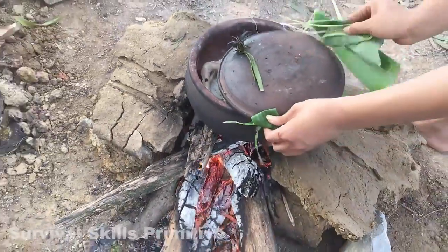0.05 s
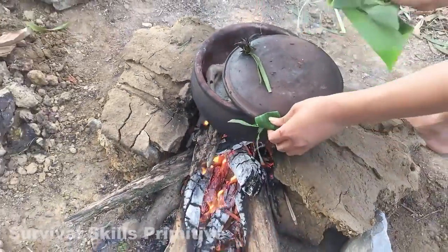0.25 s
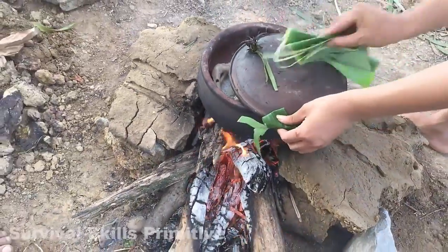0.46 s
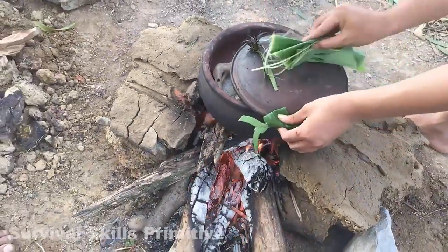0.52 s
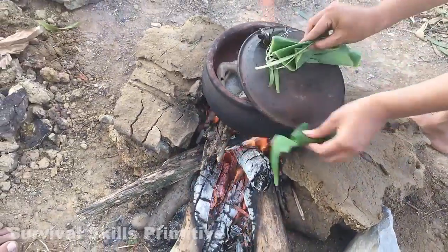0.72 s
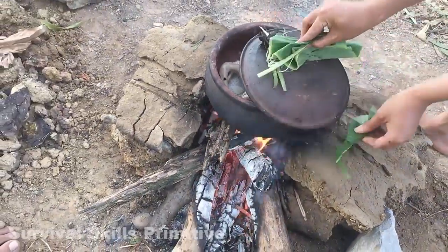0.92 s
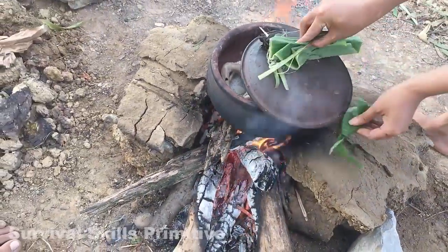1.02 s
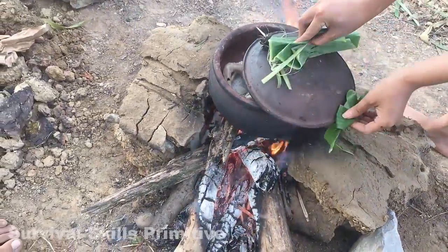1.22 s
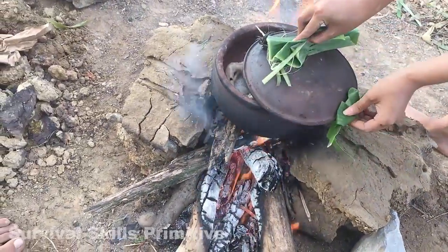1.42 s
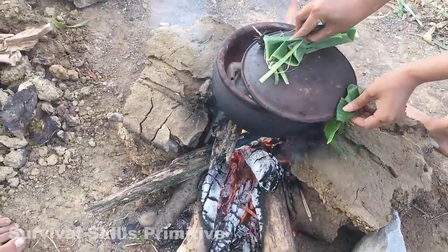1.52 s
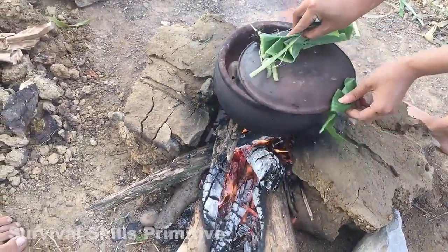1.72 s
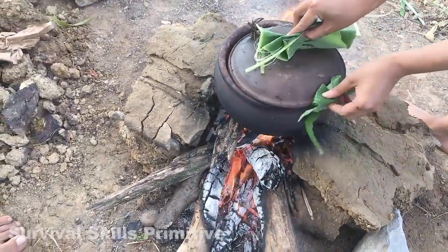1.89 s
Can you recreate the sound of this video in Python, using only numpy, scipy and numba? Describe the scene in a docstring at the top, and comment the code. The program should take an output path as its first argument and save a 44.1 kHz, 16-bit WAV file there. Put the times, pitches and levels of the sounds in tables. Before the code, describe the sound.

Close up outdoors, a clay lid scrapes over a clay pot, clinks sharply, knocks dully into place and scrapes once more. Leaves rustle softly, embers tick and birds chirp far off under a faint wind rumble.

```python
"""A heavy clay lid is shifted on a clay pot over a wood fire, outdoors.
It grinds along the rim, drops with a ringing knock, settles with a dull one, then is dragged again.
Knocks and sand grains caught under the lid make the same clay tones ring. The leaves used as
pot holders rustle, embers tick, birds chirp far off and wind rumbles on the microphone."""
import sys
import numpy as np
from scipy import signal
from scipy.fft import rfft, irfft
from scipy.io import wavfile
from numba import njit

SR = 44100
rng = np.random.default_rng(int(sys.argv[2]) if len(sys.argv) > 2 else 0)


def wav_record(signal):
    """Record a signal, one row per channel, as 16-bit PCM in the file named by sys.argv[1]."""
    frames = np.transpose(np.atleast_2d(signal))
    bounded = np.clip(frames, -1, 1)
    # unit amplitude maps onto the largest positive 16-bit level
    quanta = np.round(bounded * 32767).astype(np.int16)
    wavfile.write(sys.argv[1], SR, quanta)


N = 85995
T = np.arange(N) / SR

# The tones of lid and pot. Each row: pitch in Hz, seconds to fade by 60 dB, gain in dB when
# struck, gain in dB when rubbed.
CLAY_TONES = [(383.4, 0.084, 25, 15), (435.6, .03, 35, 14), (560, 0.014, 28.5, 7), (857, 0.11, 29, -3),
              (949, 0.013, 30.5, 3.5), (1283.3, .088, 36, 12), (1347, 0.012, 26, 0.5),
              (1784, 0.066, 25, 12.5), (2270, 0.11, 47, 23.5), (2257, 0.063, 3.5, 17.5),
              (2850, 0.13, 19.5, 14.5), (2956, 0.011, 19, 9.5), (3396, 0.022, 15.5, 11.5),
              (3780, 0.037, 10.5, 16.5), (4129, 0.081, 24.5, 16.5), (4224, 0.037, -3.5, 16),
              (4830, 0.032, -1.5, -8), (5356, 0.0615, -1, 6), (5710, 0.059, 14, 13),
              (5814, 0.048, -5.5, 12.5), (7070, 0.054, 5.5, 4), (7516, 0.07, 3.5, 13),
              (7440, .055, 1, -12.5), (8900, 0.053, -1, 0.5), (9360, .035, -12, 7.5),
              (11580, 0.0056, -18, -2.5), (13000, 0.026, -13.5, -16), (13900, .02, -6, -3)]
# The two drags. Each row: time in seconds, level in dB, extra bass in dB, extra treble in dB.
FIRST_SLIDE = [(0.0, -46, 8.5, -6.5), (0.028, -47, 13, -4.5), (0.05, -41, -6.5, -23), (0.06, -37, 3.5, -11),
               (0.094, -43, 8, -2.5), (0.132, -35, 3.5, -12), (0.152, -32.5, -4.5, -14.5),
               (0.172, -48, 9.5, -3.5), (0.205, -46, 7.5, -14)]
LAST_SLIDE = [(1.39, -82, -8, 7), (1.434, -49, -10, -3.5), (1.566, -41, 1.5, -4), (1.686, -37.5, -8.5, -6),
              (1.736, -53, 0, -1), (1.78, -43, 0, -2.5), (1.79, -48, 12, 2), (1.812, -37, -4, -2),
              (1.844, -32, -14, 2), (1.858, -39.5, 6, 0), (1.912, -33.5, 1, -2.5), (1.922, -38, 12, -5),
              (1.928, -31, -7, -3), (1.95, -33, -1, -2.5)]
# Brief slips on the rim. Each row: middle and length in seconds, level in dB, extra treble in dB.
SLIPS = [(0.256, 0.021, -40.5, 1.5), (0.45, 0.015, -55.5, 6.5), (0.494, 0.025, -50, 6),
         (0.601, 0.075, -57, 4), (0.874, 0.013, -49.5, 7), (0.886, 0.0081, -41, 5),
         (1.432, 0.0092, -48.5, 5), (1.835, 0.024, -43, 0)]
# The tones go sharp as the last drag begins. Each row: time in seconds, rise as a share of pitch.
PITCH_RISE = [(1.0, 0.0018), (1.42, 0.013), (1.62, 0.0148), (1.8, 0.0034)]
# The lid hits the rim. Each row: time in seconds, strength in dB, Hz above which the hit is dulled.
KNOCKS = [(0.2189, 0.5, 13090), (.2512, -14.5, 7000), (.272, -20, 536), (.8695, -11, 840),
          (.8885, -22, 1250)]
# The pot takes the lid's weight. Each row: time in seconds, strength in dB.
THUDS = [(.8692, -1.5)]
# The pot's hollow tones. Each row: pitch in Hz, seconds to fade by 60 dB, gain in dB.
THUD_TONES = [(436, 0.022, 9.1), (620, 0.027, 28.1), (900, 0.048, 22.7), (1080, 0.014, 17.3),
              (1350, 0.0082, 10)]
# Leaves brush the clay. Each row: middle and length in seconds, rub in dB, swish in dB.
RUSTLES = [(.325, 0.057, -48.5, -59), (0.584, 0.023, -53.5, -59.5), (0.657, 0.053, -50, -47.5),
           (0.775, 0.022, -59, -62), (0.83, .12, -47.5, -57), (0.984, 0.023, -50.5, -57.5),
           (1.08, 0.086, -65.5, -69), (1.23, 0.074, -55.5, -58)]
# Ember ticks. Each row: start in seconds, level in dB.
TICKS = [(.748, -43), (0.943, -52), (.954, -43), (1.191, -45), (1.313, -45), (1.351, -44), (1.367, -41)]
# Bird calls. Each row: start and length in seconds, first and last pitch in Hz, level in dB.
CHIRPS = [(.415, .055, 3350, 2650, -54.5), (.565, 0.048, 2850, 3400, -56), (0.696, 0.038, 2940, 2680, -50),
          (0.986, 0.054, 2660, 2950, -55), (1.05, 0.056, 3450, 3610, -56),
          (1.092, 0.049, 2785, 2690, -51.5), (1.158, 0.236, 1120, 1080, -62),
          (1.247, 0.0437, 2926, 3680, -52.5), (1.275, 0.018, 3750, 3400, -48),
          (1.327, 0.026, 3150, 3000, -54.5)]
# The wind's rise and fall. Each row: time in seconds, relative level in dB.
GUSTS = [(0.0, -33), (0.156, -46.5), (0.342, -49), (0.418, -36.5), (0.476, -55.5), (0.52, -43.5),
         (0.684, -53.5), (0.7, -45.5), (1.08, -52), (1.254, -40), (1.4, -54.5), (1.422, -40.5),
         (1.606, -49), (1.628, -35), (1.764, -48.5), (1.814, -34.5), (1.884, -45), (1.95, -36)]
# The tone colour of each noise. Each row: frequency in Hz, relative level in dB.
GRIT_COLOUR = [(330, -23), (600, 13.5), (1500, 17.5), (3500, 9), (6500, -20.5), (10000, -31), (15000, -20)]
CRACK_COLOUR = [(330, -6.5), (750, -7.5), (1350, -13), (2000, -20.5), (3300, 12.5), (4900, -9),
                (6000, -10.5), (9000, -23), (15000, -33.5)]
LEAF_RUB_COLOUR = [(400, -7), (1200, -6), (2100, 3.5), (3500, 0), (5000, -10), (9000, -33)]
SWISH_COLOUR = [(2500, 2), (5000, -0.5), (8000, 1), (12500, -2), (16000, -11)]
AIR_COLOUR = [(120, -7.5), (200, 0.5), (278, -10.5), (473, -10), (1420, -13), (2090, -18), (3620, -12),
              (4950, -21.5), (5840, -20.5), (12200, -25), (16000, -29.5)]
WIND_COLOUR = [(12, -26), (20, -22), (43, -0.5), (64, 2), (89, -3), (150, -10.5), (203, -18.5), (260, -20),
               (340, -44), (570, -120)]


def lid_scraping():
    """Sand grains catch and break under the shaking lid and ring the clay; some grit is heard directly."""
    judder = rms_one(from_db(drift(per_s=82)))
    rub = grains(per_s=6000, spread_db=1.5) * judder
    # How hard the low, middle and high tones are rubbed at each moment.
    bass = middle = sum(from_db(db) * swell(s, length) for s, length, db, _ in SLIPS)
    treble = sum(from_db(db + extra_db) * swell(s, length) for s, length, db, extra_db in SLIPS)
    bass_lift_db, treble_lift_db = 3.5, 7.5
    for slide in (FIRST_SLIDE, LAST_SLIDE):
        s, db, bass_db, treble_db = np.transpose(slide)
        level = from_db(np.interp(T, s, db)) * (T >= s[0]) * (T <= s[-1])
        bass = bass + level * from_db(np.interp(T, s, bass_db) + bass_lift_db)
        middle = middle + level
        treble = treble + level * from_db(np.interp(T, s, treble_db) + treble_lift_db)
    grit = from_db(-7.5) * colour(rub, GRIT_COLOUR) * np.sqrt(middle * treble)
    rise = np.interp(T, *np.transpose(PITCH_RISE))
    ringing = 0
    for hz, fade_s, _, db in CLAY_TONES:
        drive = bass if hz < 2000 else middle if hz < 5000 else treble
        # The moving contact favours one tone, then another, and bends their pitch.
        flicker = from_db(2.5 * drift(per_s=50))
        bend = rise + 0.004 * drift(per_s=29)
        ringing = ringing + from_db(db - 1) * resonate(rub * drive * flicker, hz, fade_s, bend)
    return grit + ringing


def lid_knocks():
    """Each hit gives a short crack and rings the clay; the first two are bright, the later ones dull."""
    force, cracks = 0, 0
    for s, db, soft_hz in KNOCKS:
        crushed_grains = from_db(-45) * dying(s, decay_s=0.009) * rng.standard_normal(N)
        force = force + from_db(db) * soften(click(s) + crushed_grains, soft_hz)
        crack = dying(s, decay_s=0.008) * colour(rng.standard_normal(N), CRACK_COLOUR)
        cracks = cracks + from_db(db - 24.5) * soften(crack, soft_hz)
    return cracks + sum(from_db(db) * resonate(force, hz, fade_s) for hz, fade_s, db, _ in CLAY_TONES)


def pot_thud():
    """The lid settles softly and the pot answers with hollow tones that die quickly."""
    force = soften(sum(from_db(db) * click(s) for s, db in THUDS), above_hz=1770)
    return sum((-1) ** k * from_db(db) * resonate(force, hz, fade_s)  # every other tone is flipped
               for k, (hz, fade_s, db) in enumerate(THUD_TONES))


def leaves():
    """Leaves brush over the clay in tiny clicks that blur into a low rub and a high swish."""
    rub_level = sum(from_db(db) * swell(s, length) for s, length, db, _ in RUSTLES)
    swish_level = sum(from_db(db) * swell(s, length) for s, length, _, db in RUSTLES)
    rub = colour(grains(per_s=5600, spread_db=3.5), LEAF_RUB_COLOUR)
    swish = colour(grains(per_s=6200, spread_db=3), SWISH_COLOUR)
    return rub_level * rub + swish_level * swish


def embers():
    """The fire gives a few dry ticks, each a tiny burst of bright noise."""
    bursts = sum(from_db(db) * dying(s, decay_s=0.0013) for s, db in TICKS)
    return bursts * colour(rng.standard_normal(N), SWISH_COLOUR)


def birds():
    """Each far call is a short whistle that wavers as it glides up or down."""
    calls = 0
    for s, length, first_hz, last_hz, db in CHIRPS:
        progress = np.clip((T - s) / length, 0, 1)
        waver = 1 + 0.025 * drift(per_s=350)
        hz = (first_hz + (last_hz - first_hz) * progress) * waver
        whistle = np.sin(2 * np.pi * np.cumsum(hz) / SR)
        calls = calls + from_db(db) * np.sin(np.pi * progress) * whistle
    return calls


def air():
    """The outdoor air hisses evenly while gusts rumble on the microphone."""
    hiss = from_db(-56) * colour(rng.standard_normal(N), AIR_COLOUR)
    gusts = from_db(np.interp(T, *np.transpose(GUSTS)) - 0.5)
    return hiss + gusts * colour(rng.standard_normal(N), WIND_COLOUR)


def with_echo(x, echo_db):
    """Stones and ground scatter the sound, adding a short echo."""
    tail = rng.standard_normal(N) * dying(0.004, decay_s=0.021)
    return x + from_db(echo_db) * signal.fftconvolve(x, tail / np.linalg.norm(tail))[:N]


def resonate(x, hz, fade_s, bend=0):
    """Ring one clay tone with the push x; bend shifts its pitch by that share."""
    angle = 2 * np.pi * hz / SR
    # A broad filter, ringing for just 3.65 cycles, first weakens what lies far from the tone.
    broad = np.exp(-np.log(1000) * hz / (3.65 * SR))
    feed = np.array([1, 0, -1]) * (1 - broad ** 2) / 2
    feedback = [1, -(1 + broad ** 2) * np.cos(angle), broad ** 2]
    push = signal.lfilter(feed, feedback, x + 1e-18)
    decay = np.exp(-np.log(1000) / (fade_s * SR))
    steps = decay * np.exp(1j * angle * (1 + bend)) * np.ones(N)
    return 2 * (1 - decay) * ring(push + 1e-18, steps)


@njit
def ring(push, steps):
    """A fading vibration: each step turns and shrinks it, and each push feeds it."""
    out, swing = np.zeros(len(push)), 0j
    for i in range(len(push)):
        swing = swing * steps[i] + push[i]
        out[i] = swing.real
    return out


def soften(x, above_hz):
    """Dull the highs, as a cushioned contact does."""
    return signal.sosfilt(signal.butter(2, above_hz, fs=SR, output="sos"), x + 1e-18)


def colour(x, points):
    """Give x a tone colour that falls steeply beyond the table's ends, at strength 1."""
    hz, db = np.transpose(points)
    freqs = np.maximum(np.arange(N + 1) * SR / (2 * N), 1)
    edges = 1 / np.sqrt((1 + (hz[0] / freqs) ** 8) * (1 + (freqs / hz[-1]) ** 8))
    gain = from_db(np.interp(np.log(freqs), np.log(hz), db))
    return rms_one(irfft(rfft(x, 2 * N) * edges * gain)[:N])


def grains(per_s, spread_db):
    """Random clicks of uneven size, at strength 1."""
    sizes = from_db(spread_db * np.minimum(rng.exponential(1, N), 5)) * rng.choice([-1, 1], N)
    return rms_one(sizes * (rng.random(N) < per_s / SR))


def drift(per_s):
    """A smooth random wobble, at strength 1."""
    return rms_one(np.interp(T * per_s, np.arange(1000), rng.standard_normal(1000)))


def swell(s, length):
    """A smooth rise and fall centred on second s."""
    return np.exp(-2 * ((T - s) / length) ** 2)


def dying(s, decay_s):
    """A sudden start at second s, then a fade."""
    return (T >= s) * np.exp(-np.maximum(T - s, 0) / decay_s)


def click(s):
    """A single sharp push at second s."""
    return 1.0 * (np.arange(N) == int(s * SR))


def from_db(db):
    """Turn decibels into a factor to multiply by."""
    return 10 ** (np.asarray(db) / 20)


def rms_one(x):
    """Scale x to an average strength (root mean square) of 1."""
    return x / np.sqrt(np.mean(x ** 2) + 1e-20)


def scene():
    """The pot close by, with leaves, fire, birds and air around it."""
    low_cut = signal.butter(4, 313, "high", fs=SR, output="sos")  # the pot is too small for deep bass
    pot = signal.sosfilt(low_cut, lid_knocks() + pot_thud() + lid_scraping())
    near = with_echo(pot, echo_db=-36) + leaves() + embers()
    far = with_echo(birds(), echo_db=-2.5)  # distance blurs the calls
    return (near + far + air())[None]


def record(dry):
    """Clip the loudest peaks and cut the very highest treble."""
    high_cut = signal.ellip(10, .2, 80, 15750, fs=SR, output="sos")
    return signal.sosfilt(high_cut, np.clip(dry, -.97, .97))


dry = scene()
out = record(dry)
wav_record(out)
```